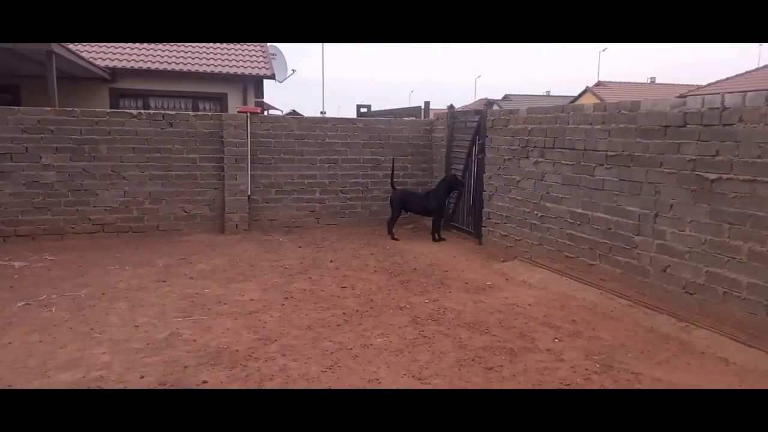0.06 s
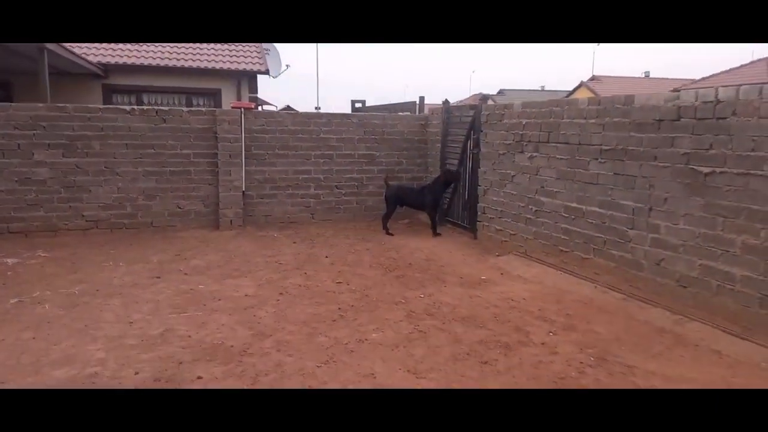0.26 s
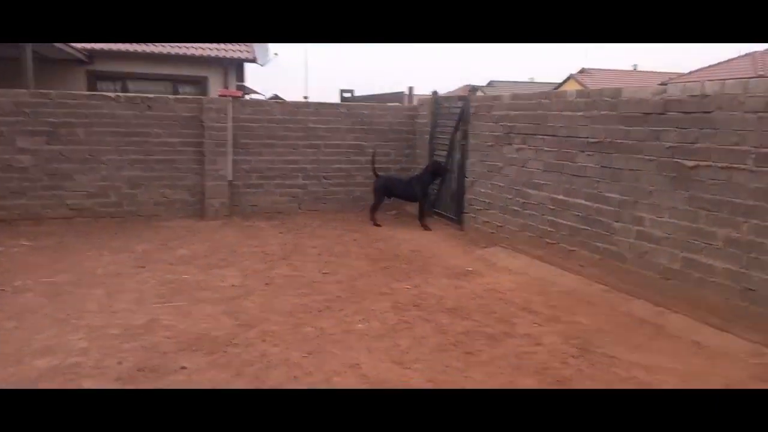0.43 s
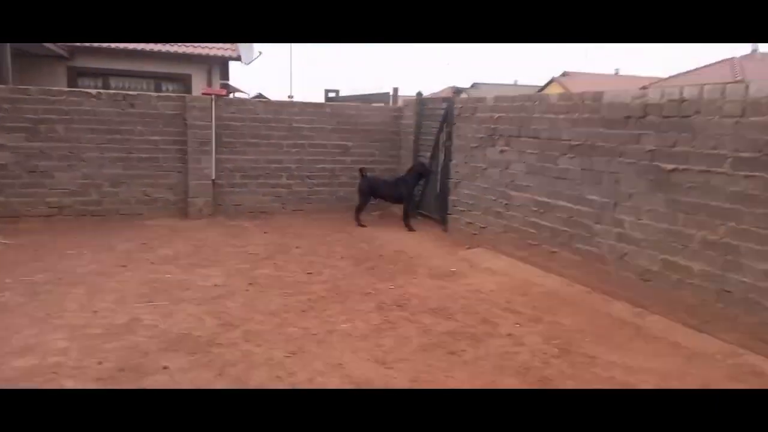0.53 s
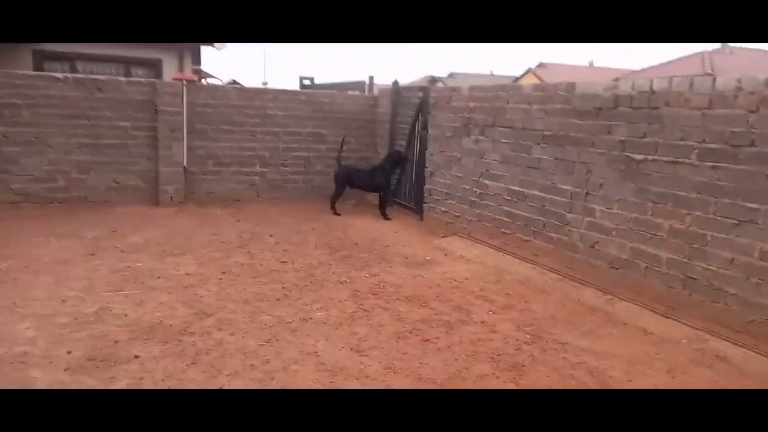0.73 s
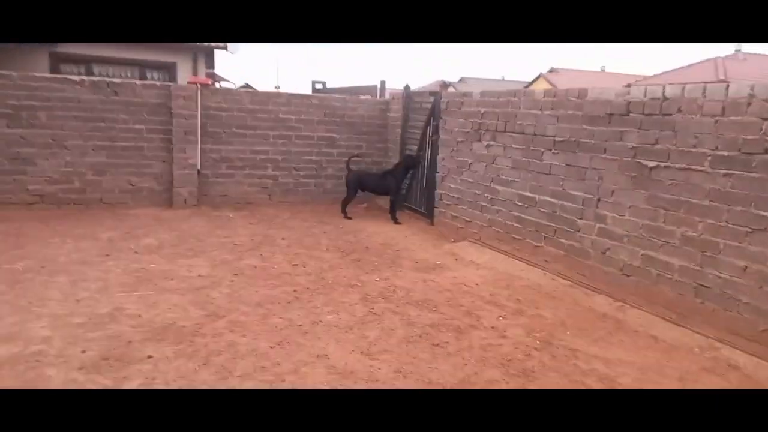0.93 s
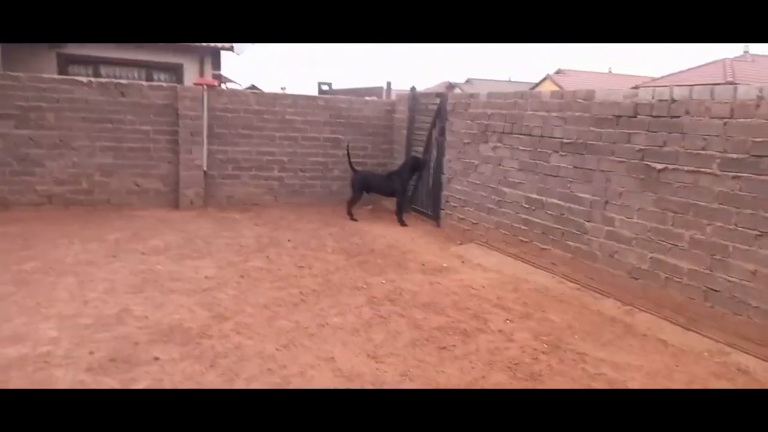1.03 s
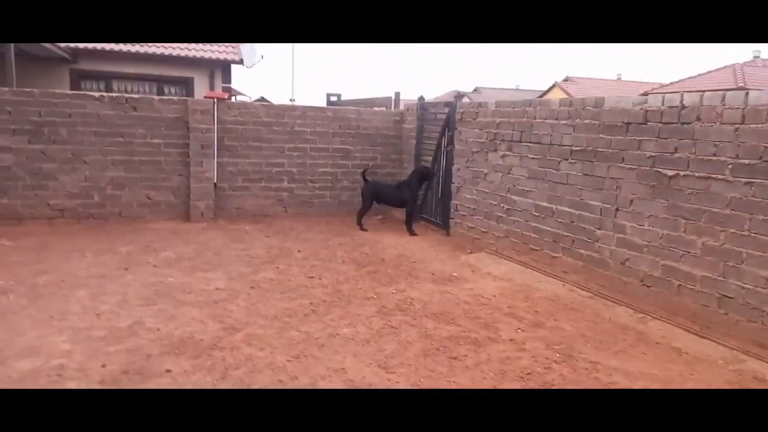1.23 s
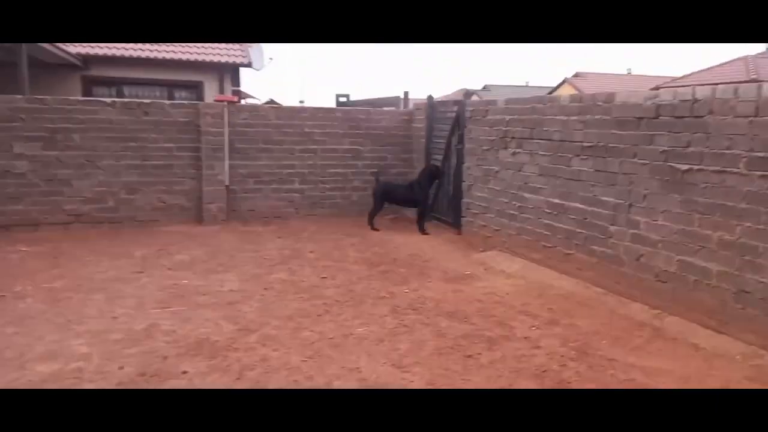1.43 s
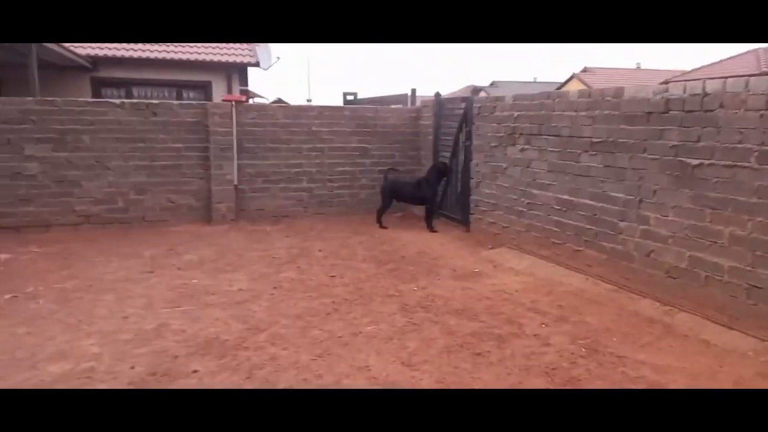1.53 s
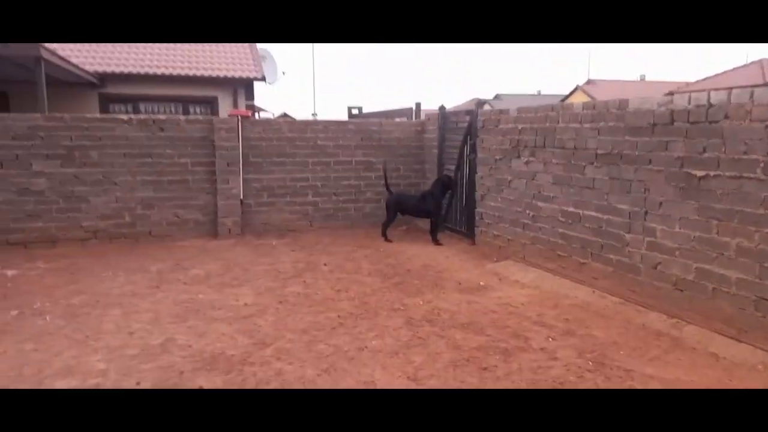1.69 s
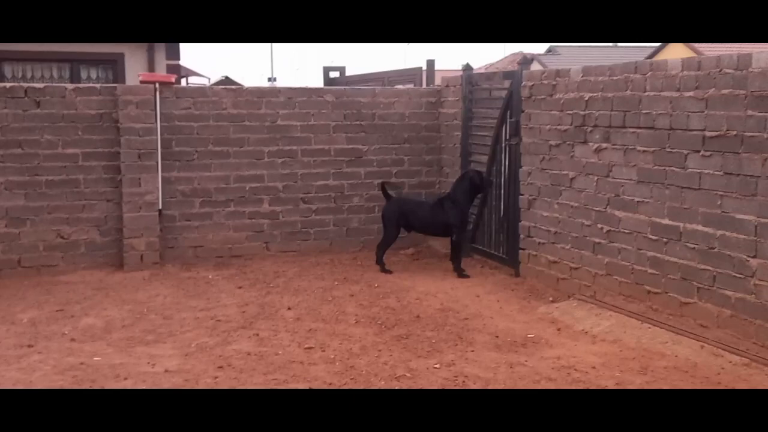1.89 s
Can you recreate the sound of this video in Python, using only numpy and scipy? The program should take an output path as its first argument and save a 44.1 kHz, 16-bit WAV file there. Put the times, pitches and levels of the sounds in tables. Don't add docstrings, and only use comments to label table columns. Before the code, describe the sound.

A large dog some metres away barks twice, deep and loud, slightly overloading the microphone; the walls slap the barks back with a long tail, over town rumble and faint insects, then a far rooster's held crow.

```python
import sys
import numpy as np
from scipy import signal
from scipy.fft import rfft, irfft, next_fast_len
from scipy.io import wavfile
from scipy.ndimage import uniform_filter1d, map_coordinates

SR = 44100
rng = np.random.default_rng(int(sys.argv[2]) if len(sys.argv) > 2 else 0)


def unload_audio(sound):
    columns = np.transpose(np.atleast_2d(sound))
    steps = np.round(np.clip(columns, -1, 1) * 32767)
    wavfile.write(sys.argv[1], SR, steps.astype(np.int16))


def attenuation_scalar(level_db):
    decades = np.asarray(level_db, float) / 20
    return 10 ** decades


N = 85995
TIME_S = np.arange(N) / SR

# (frequency [Hz], density [dB per Hz])
TOWN_SPECTRUM = [(25, -40.5), (45, -9), (62, -3.5), (120, -0.5), (440, -12.5), (1500, -20), (3000, -30.5),
                 (5200, -41)]
INSECT_SPECTRUM = [(5200, -64.5), (6000, -1), (6500, 5), (7200, -1.5), (8000, -12.5)]
HISS_SPECTRUM = [(4000, -4), (10000, -13.5), (12500, -6.5), (15000, -3)]
# (frequency [Hz], correlation [-1 to 1])
TOWN_CORRELATION = [(60, 0.29), (180, 0.99), (500, 0.69), (900, 0), (1500, -0.13), (3000, -0.77)]

# (time [s], pitch [Hz], level [dB], high overtones [dB])
CROW_NOTE = [
    (1.3, 702, -70, 0),
    (1.4, 703, -59, 1),
    (1.49, 699, -59, -4),
    (1.55, 678, -51, -9),
    (1.65, 681, -47, -7),
    (1.76, 681, -47, -11),
    (1.82, 681, -52, -9),
    (1.95, 682, -58, -9),
]
# (multiple of pitch [1], level [dB])
CROW_LOW_OVERTONES = [(2, -2.2), (3, -4.7)]
CROW_HIGH_OVERTONES = [(4, -7), (5, -5), (6, -12.5), (7, -20.5)]
# (frequency [Hz], density [dB per Hz])
CROW_OPENING_SPECTRUM = [(2300, -25), (2550, -1), (2750, 0.5), (2950, -6), (3200, -26.5)]
SCUFF_SPECTRUM = [(2000, -24), (3500, -5), (4500, -3), (5500, -11), (8000, -28)]

# (time [s], half length [s], level [dB])
LIP_WHISTLES = [
    (0.258, 0.023, -39.5),
    (0.938, .006, -29.5),
]
# (centre [Hz], width [Hz], level [dB])
LIP_RESONANCE = [(5500, 280, 0)]
CHEST_RESONANCE = [(414.7, 250, 0)]
MOUTH_RESONANCES = [(778, 149, 8.5), (1150, 165, 1), (1340, 108, 2), (2130, 120, -16), (2500, 240, -29)]
# (frequency [Hz], density [dB per Hz])
TEETH_SPECTRUM = [(2500, -6.5), (4000, 3.5), (5500, 2), (7500, -1), (10000, -12), (13500, -12.5),
                  (16000, -13)]
# (time [s], pitch [Hz], level [dB], mouth opening [dB], roughness [0 to 1])
BARK_COURSES = [
    [(.195, 239.8, -50, -17, 0.78), (.228, 272, -22.5, -18.5, 1), (.246, 329.4, -11.5, -9.5, 0.4),
     (.27, 339.3, -8.5, -6, 0.48), (.3, 384.3, -6.5, -3.5, 0.16), (.318, 405.5, -5, -5.5, 0),
     (.328, 421.5, -1, -23, 0), (.352, 417, -3, -25.5, 0.1), (.362, 410, -24.5, -12, 0.2)],
    [(.885, 200, -47, -18, 0.71), (.925, 249.9, -17, -14.5, 0.7), (.945, 370.9, -17.5, -4.5, .6),
     (.957, 442, -4.5, -13, 0.27), (.982, 452, -6, -8, 0.29), (.998, 401.4, -4, -9, 0.42),
     (1.012, 402.4, -4, -10, 0.14), (1.054, 392.1, -5, -15.5, 0.12), (1.068, 385, -44, -6, 0)],
]

# (delay [s], left level [dB], right level [dB])
REFLECTIONS = [(.004, -10.5, -3), (.013, -10, -13.5), (.024, -17, -18.5), (.043, -22, -20.5),
               (.082, -12.5, -17), (.115, -14, -25), (.152, -5, -10.5), (.24, -17, -14.5)]
# (frequency [Hz], level [dB])
WALL_COLOUR = [(250, -4), (332, 9), (405, -2.5), (600, 5.5), (800, -7), (2650, -4), (5500, -3),
               (12000, -9.5)]
# (frequency [Hz], time to fall 60 dB [s])
REVERBERATION_TIME = [(150, 0.99), (400, 1), (1000, 0.95), (3000, 1), (8000, 0.53)]


def unit(x):
    return x / np.sqrt(np.mean(x ** 2) + 1e-20)


def even(x):
    return x / np.sqrt(np.abs(uniform_filter1d(x ** 2, SR // 40)) + 1e-9)


def along(points, hz, ends=None):
    point_hz, values = np.transpose(points)
    return np.interp(np.log(hz + 1), np.log(point_hz + 1), values, ends, ends)


def curves(rows):
    times, *columns = np.transpose(rows)
    return [np.interp(TIME_S, times, column) for column in columns]


def wobble(rate):
    knots = rng.standard_normal(int(N * rate / SR) + 4)
    return map_coordinates(knots, [np.arange(N) * rate / SR])


def filtered(x, response):
    size = next_fast_len(N + SR // 2)
    return irfft(rfft(x, size) * response(np.fft.rfftfreq(size, 1 / SR)), size)[..., :N]


def tract(peaks):
    def response(f):
        total = 0
        for k, (centre, width, db) in enumerate(peaks):
            damping = 1j * f * width
            total = total + (-1) ** k * attenuation_scalar(db) * damping / (centre * centre - f * f + damping)
        return total
    return response


def rush(spectrum, alike, patchy_db):
    z = signal.stft(rng.standard_normal((2, N)), nperseg=512)[2]
    patches = uniform_filter1d(rng.standard_normal(z.shape[1:]), 5, 0)
    patches = uniform_filter1d(patches, 10, 1)
    pair = signal.istft(z * attenuation_scalar(patchy_db * unit(patches)), nperseg=512)[1][:, :N]

    def mid_side(hz):
        angle = np.arccos(np.clip(along(alike, hz), -1, 1)) / 2
        return attenuation_scalar(along(spectrum, hz, -120)) * [np.cos(angle), np.sin(angle)]

    mid, side = filtered(pair, mid_side)
    return unit(np.array([mid + side, mid - side]))


def background():
    town_db = -39 + 1.4 * wobble(1.6)
    town = attenuation_scalar(town_db) * rush(TOWN_SPECTRUM, TOWN_CORRELATION, patchy_db=0.5)
    chirr_db = 3 * np.sin(2 * np.pi * 50.6 * TIME_S + wobble(8))
    insects_db = -62 + 1.4 * wobble(2.5) + chirr_db
    insects = attenuation_scalar(insects_db) * rush(INSECT_SPECTRUM, [(6000, 0.26)], patchy_db=0.0)
    hiss = attenuation_scalar(-66.5) * rush(HISS_SPECTRUM, [(6000, 0.064)], patchy_db=2.1)
    return town, insects + hiss


def crow_opening():
    centre_s, half_s = 0.57, 0.34
    swell = np.exp(-((TIME_S - centre_s) / half_s) ** 4)
    return attenuation_scalar(-59 + 2.6 * wobble(35)) * swell * rush(CROW_OPENING_SPECTRUM, [(2700, .4)], patchy_db=1.1)


def rooster():
    pitch_hz, level_db, high_db = curves(CROW_NOTE)
    phase = 2 * np.pi * np.cumsum(pitch_hz * (1 + .002 * wobble(67))) / SR

    def overtones(rows):
        ports = []
        for _ in range(2):
            total = 0
            for multiple, db in rows:
                flutter = attenuation_scalar(db + 5 * wobble(70))
                total = total + flutter * np.sin(round(multiple) * phase + 1.2 * wobble(71))
            ports.append(total)
        return np.array(ports)

    crow = overtones(CROW_LOW_OVERTONES) + attenuation_scalar(high_db) * overtones(CROW_HIGH_OVERTONES)
    return attenuation_scalar(level_db) * crow * (TIME_S > CROW_NOTE[0][0])


def paw_scuff():
    centre_s, half_s = 0.35, 0.025
    stroke = np.exp(-((TIME_S - centre_s) / half_s) ** 2)
    return attenuation_scalar(-53) * stroke * rush(SCUFF_SPECTRUM, [(4000, .4)], patchy_db=-6.0)


def lips():
    air = unit(filtered(rng.standard_normal(N), lambda f: tract(LIP_RESONANCE)(f) ** 2))
    return air * sum(attenuation_scalar(db) * np.exp(-((TIME_S - s) / half) ** 2) for s, half, db in LIP_WHISTLES)


def bark(rows):
    pitch_hz, level_db, mouth_db, rough = curves(rows)
    rough = np.clip(rough, 0, 1)

    cycles = np.cumsum(pitch_hz * (1 + 0.0609 * rough * wobble(250))) / SR
    phase = 2 * np.pi * cycles
    growl = np.cos(2 * np.pi * np.cumsum(110.52 * (1 + 0.1912 * wobble(40))) / SR)
    uneven = attenuation_scalar(4.5 * rough * wobble(200))
    uneven *= 1 + 0.87 * rough * np.cos(np.pi * cycles)
    uneven *= 1 + 0.96 * rough * growl

    glottis = (.5 + .5 * np.cos(phase)) ** 2
    snaps = unit(glottis ** 12 - np.mean(glottis ** 12))
    air = unit(glottis * rng.standard_normal(N))

    hoarse_hz = 140.3
    hoarse = wobble(hoarse_hz) * np.cos(phase) + wobble(hoarse_hz) * np.sin(phase)
    chest_drive = np.sin(phase) + 0.81 * rough * hoarse
    chest = even(filtered(uneven * chest_drive, tract(CHEST_RESONANCE)))

    breath = attenuation_scalar(7.5) * 4 * (rough + 0.23) * air
    mouth_top_hz = 4150
    mouth = even(filtered(uneven * (snaps + breath),
                          lambda f: tract(MOUTH_RESONANCES)(f) / (1 + 1j * f / mouth_top_hz) ** 2))

    teeth_drive = np.sqrt(np.abs(uneven)) * (air + rng.standard_normal(N))
    teeth = unit(filtered(teeth_drive, lambda f: attenuation_scalar(along(TEETH_SPECTRUM, f, -120))))

    voice = chest + attenuation_scalar(mouth_db) * mouth
    voice += attenuation_scalar(-31.5 + 0.26 * mouth_db) * teeth
    voice += attenuation_scalar(-17) * rough ** 2 * growl
    return voice * attenuation_scalar(level_db) * (TIME_S > rows[0][0]) * (TIME_S < rows[-1][0])


def yard(x):
    spread_s = rng.uniform(-1.018, 1, (len(REFLECTIONS), 2)) * 0.002047
    port_lag_s, slap_top_hz, slap_dulls = -.00008, 14000, 5

    def colour(f):
        return attenuation_scalar(along(WALL_COLOUR, f))

    def paths(f):
        ports = []
        for port in (0, 1):
            direct = np.exp(-2j * np.pi * f * port_lag_s * port)
            slaps = 0
            for k, row in enumerate(REFLECTIONS):
                loss = 1 + 1j * f / slap_top_hz * (1 + slap_dulls * row[0]) ** 2
                delay = np.exp(-2j * np.pi * f * (row[0] + spread_s[k, port]))
                slaps = slaps + attenuation_scalar(row[1 + port]) / loss * delay
            ports.append(direct + colour(f) * slaps)
        return np.array(ports)

    hz, t, z = signal.stft(rng.standard_normal((3, SR)), SR, nperseg=256)
    decay = attenuation_scalar(-60 * t / along(REVERBERATION_TIME, hz)[:, None])
    tail = signal.istft(z * decay, SR, nperseg=256)[1]
    tail = 0.66 * tail[2] + tail[:2]
    tail = tail / np.linalg.norm(tail[0])
    delayed = np.pad(x, (SR // 30, 0))[None]
    late = signal.fftconvolve(delayed, tail, axes=1)[:, :N]
    return filtered(x, paths) + attenuation_scalar(-6) * filtered(late, colour)


def scene():
    dog = sum(yard(bark(rows)) for rows in BARK_COURSES) + yard(lips())
    loud = np.sqrt(np.abs(uniform_filter1d(dog[0] ** 2, int(.2 * SR))))
    town, high = background()
    duck = attenuation_scalar(-5 * loud / (loud + 0.07))
    return dog + rooster() + town + high * duck + crow_opening() + paw_scuff()


def roll_off(x):
    return signal.sosfilt(signal.butter(12, 15700, fs=SR, output="sos"), x)


def record(dry):
    x = dry * attenuation_scalar(0.98)
    x = x + .007 * x ** 2
    ceiling, hardness = 1.0, 14
    x = x / (1 + np.abs(x / ceiling) ** hardness) ** (1 / hardness)
    mix = np.clip(filtered(x, lambda hz: hz < 15700), -1, 1)
    return roll_off(mix)


dry = scene()
out = record(dry)
unload_audio(out)
```